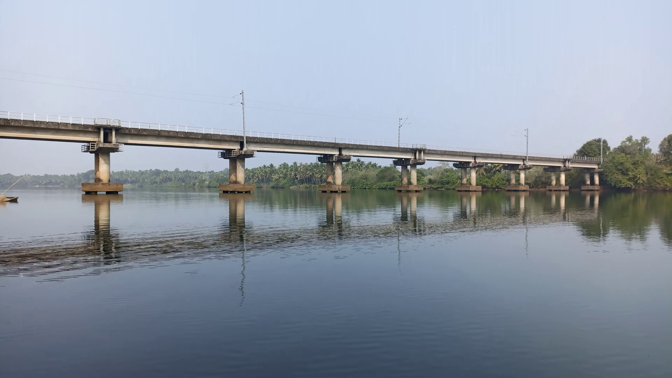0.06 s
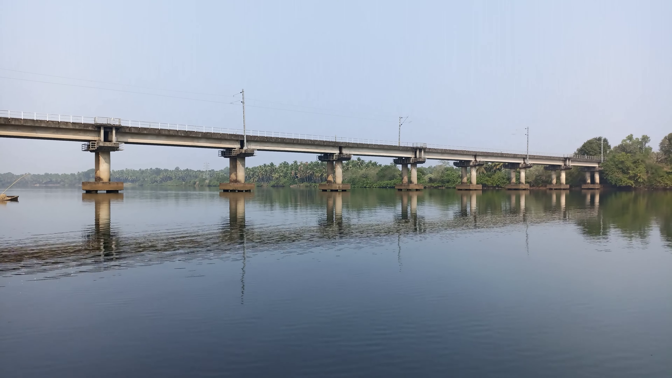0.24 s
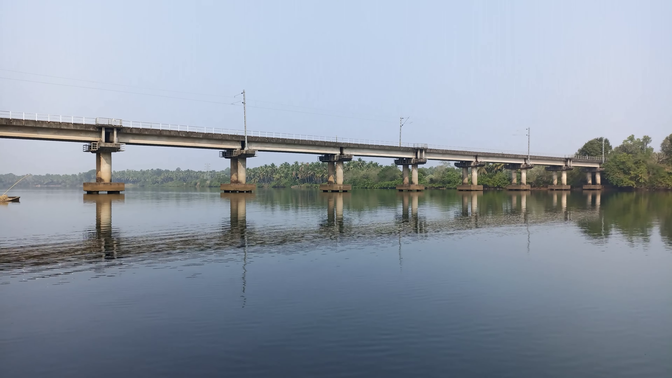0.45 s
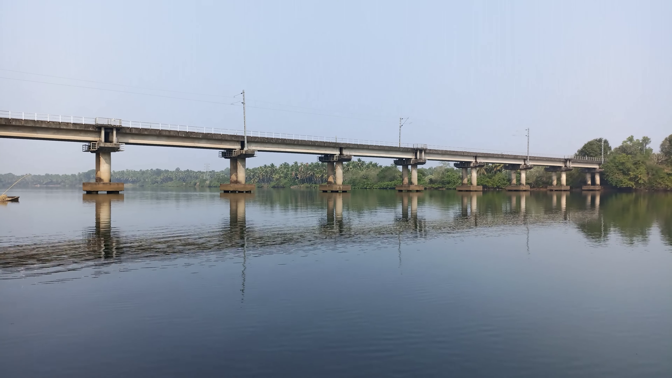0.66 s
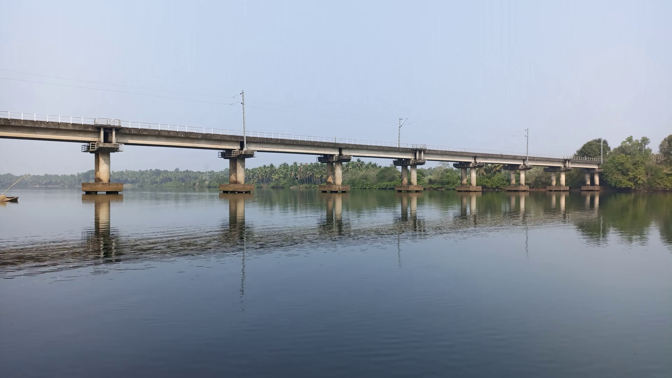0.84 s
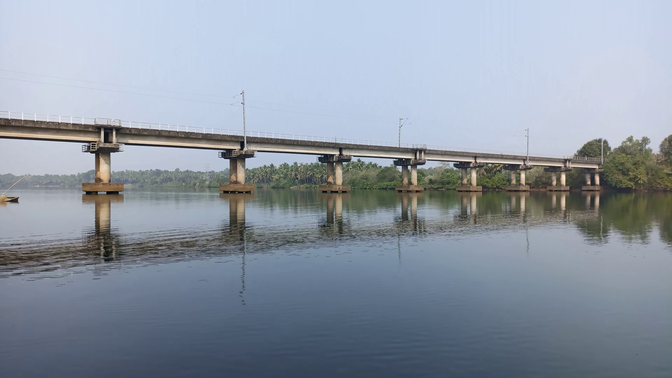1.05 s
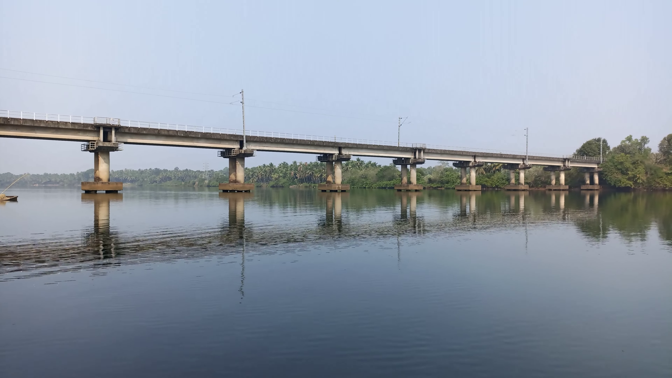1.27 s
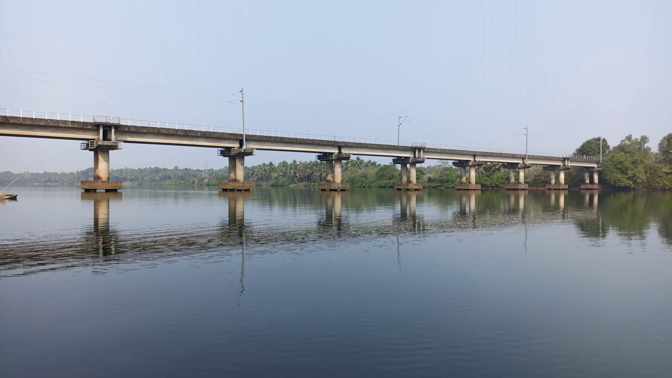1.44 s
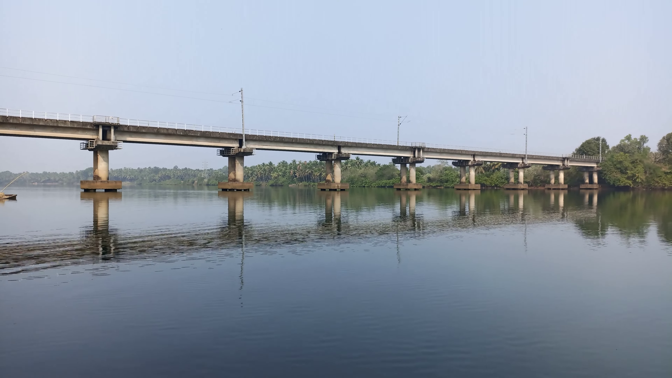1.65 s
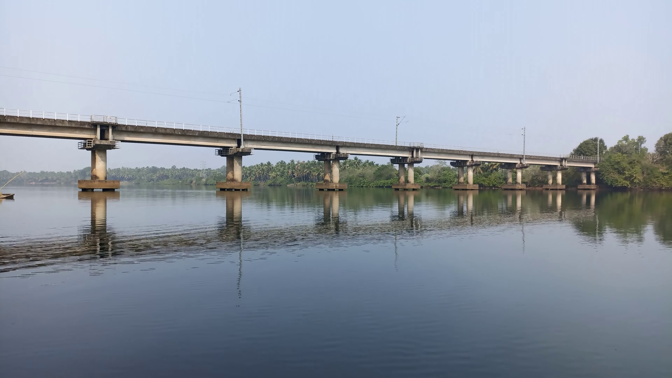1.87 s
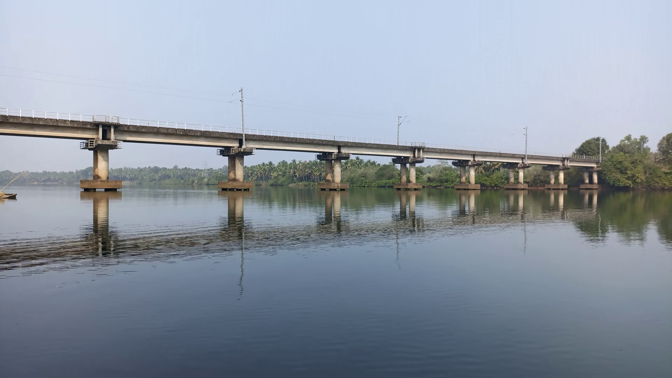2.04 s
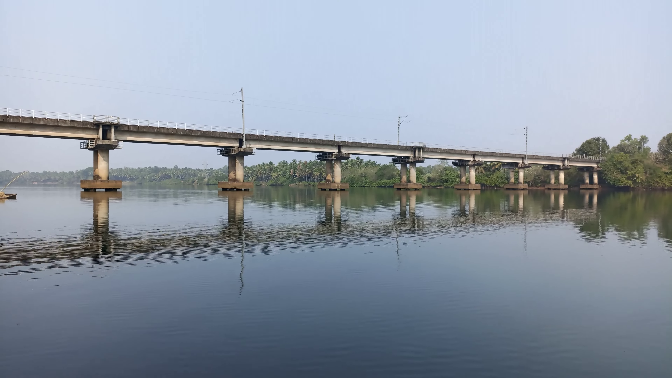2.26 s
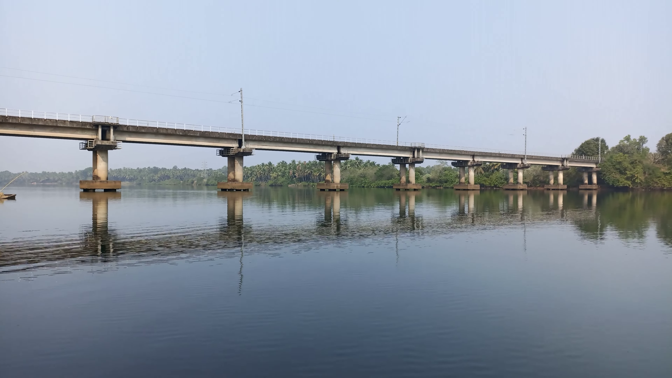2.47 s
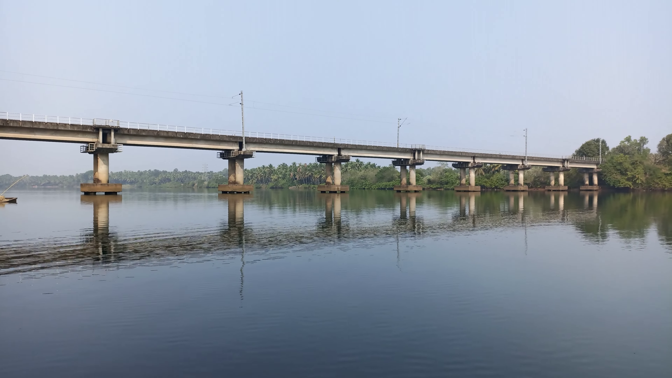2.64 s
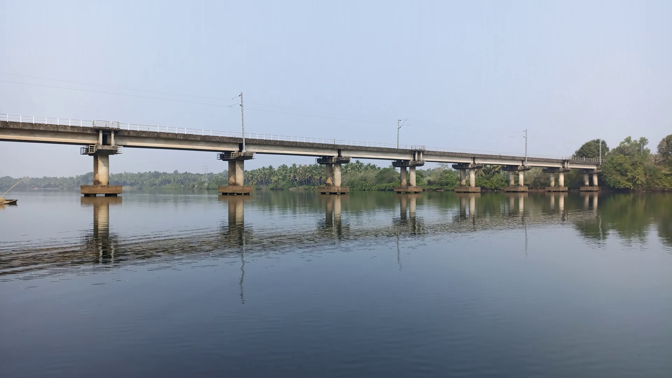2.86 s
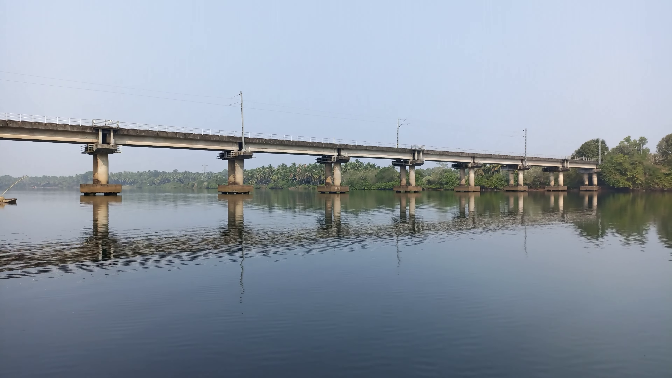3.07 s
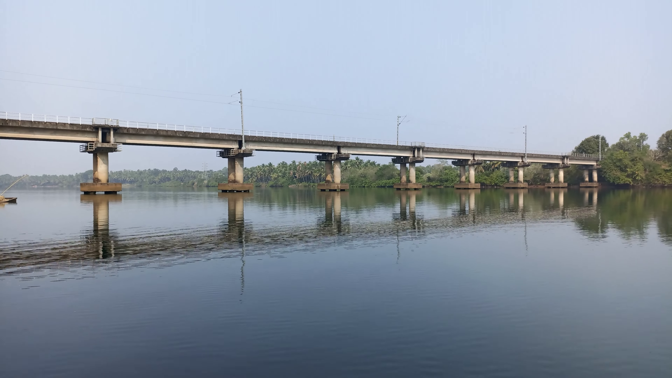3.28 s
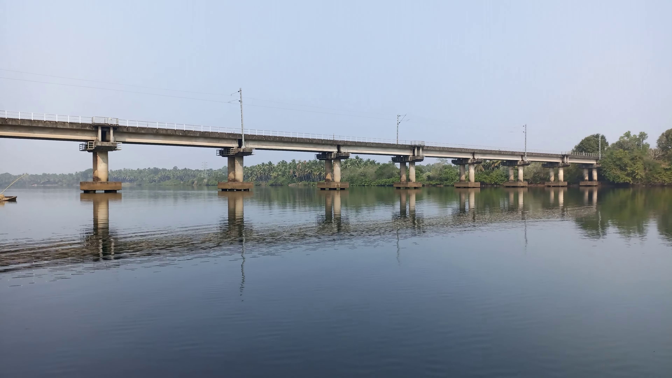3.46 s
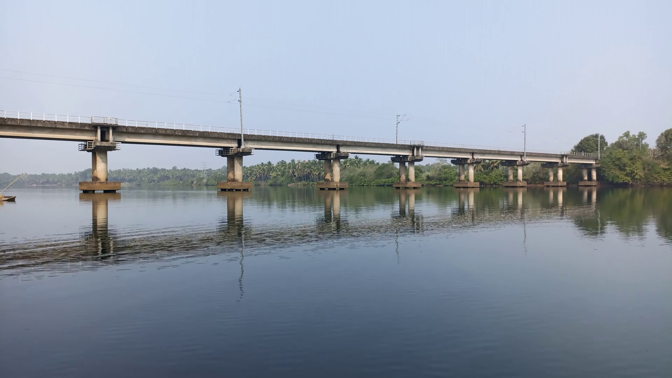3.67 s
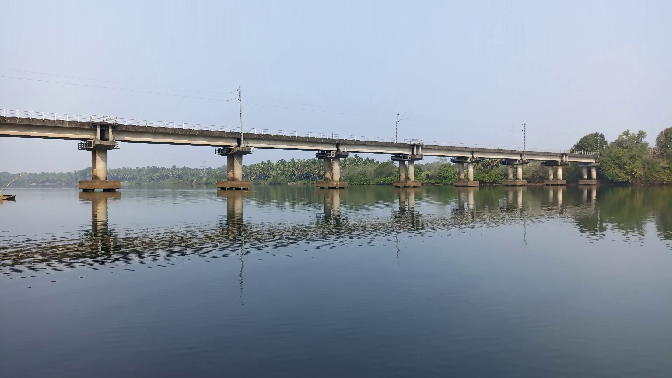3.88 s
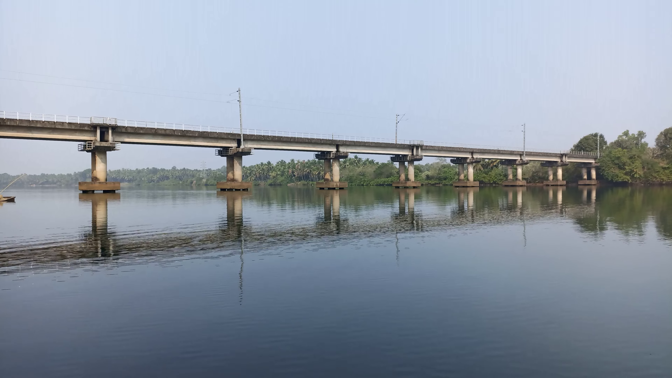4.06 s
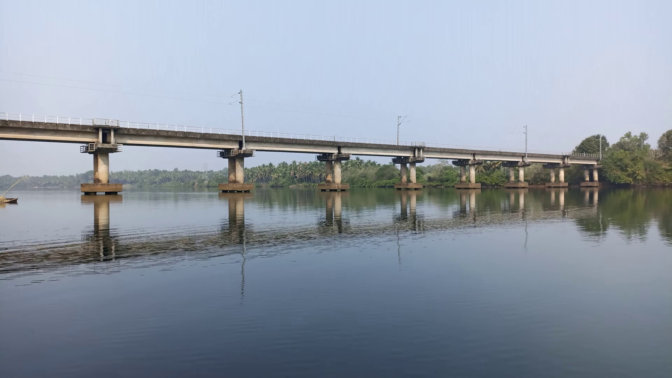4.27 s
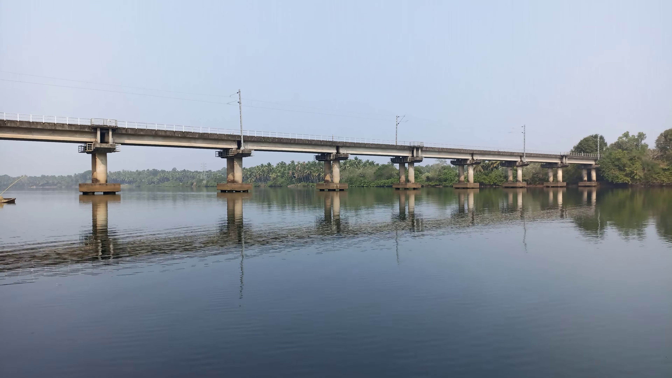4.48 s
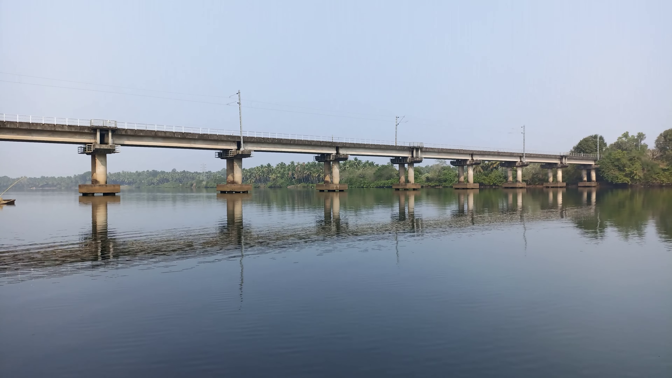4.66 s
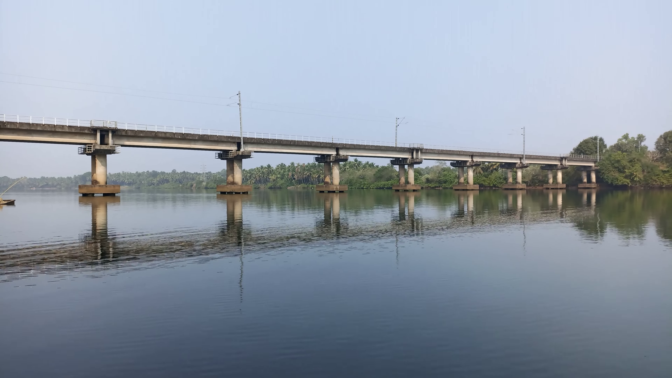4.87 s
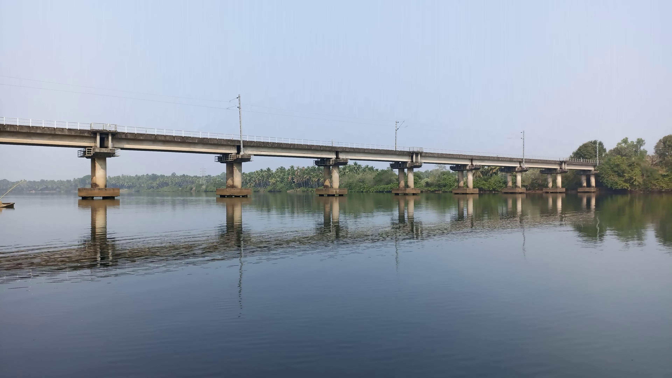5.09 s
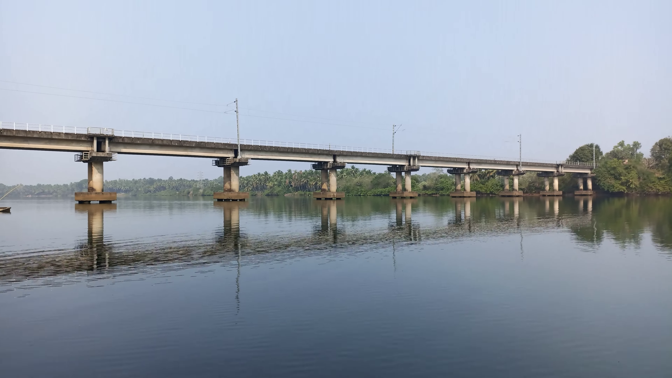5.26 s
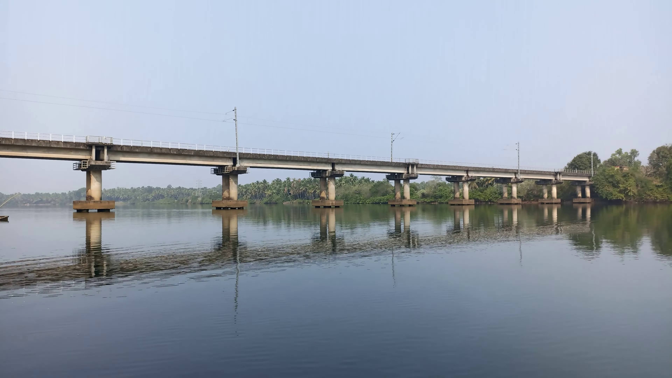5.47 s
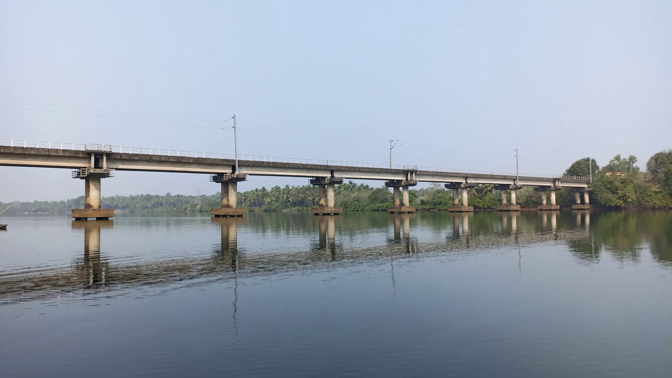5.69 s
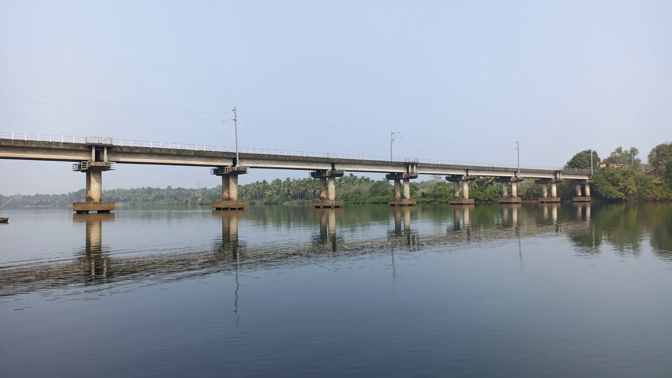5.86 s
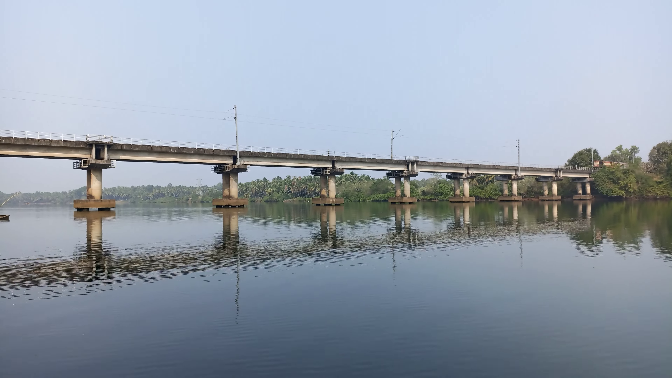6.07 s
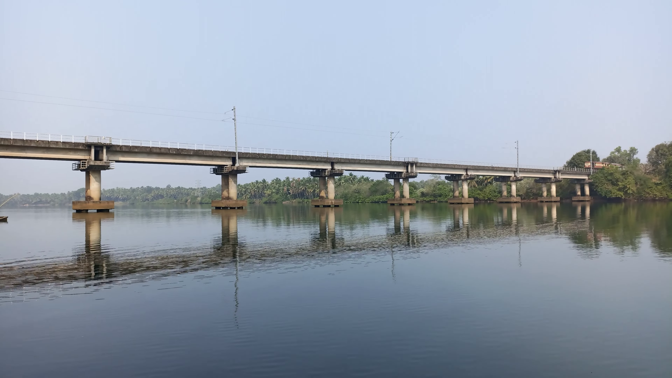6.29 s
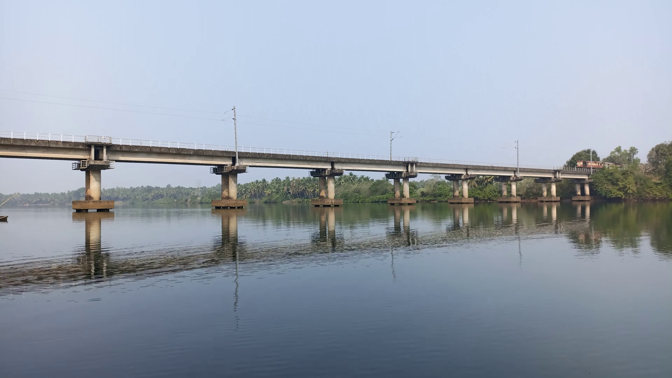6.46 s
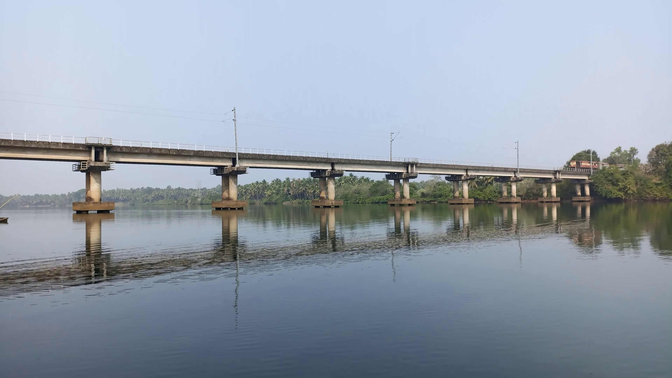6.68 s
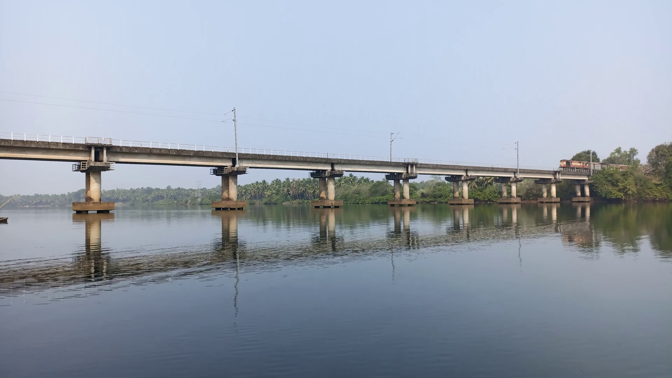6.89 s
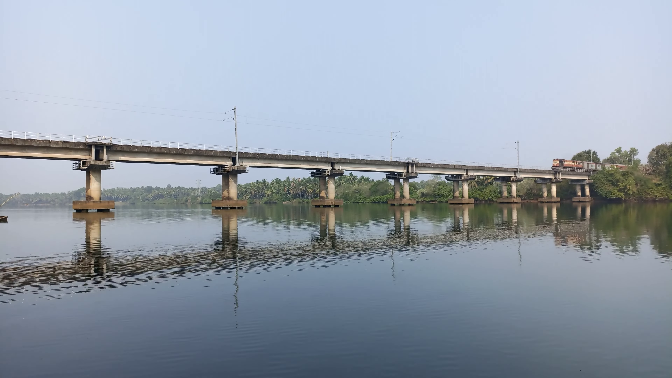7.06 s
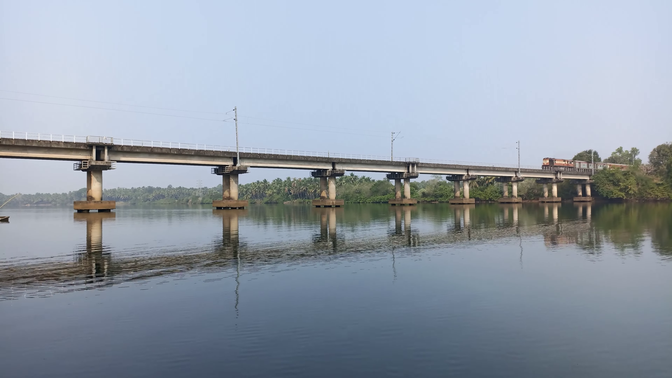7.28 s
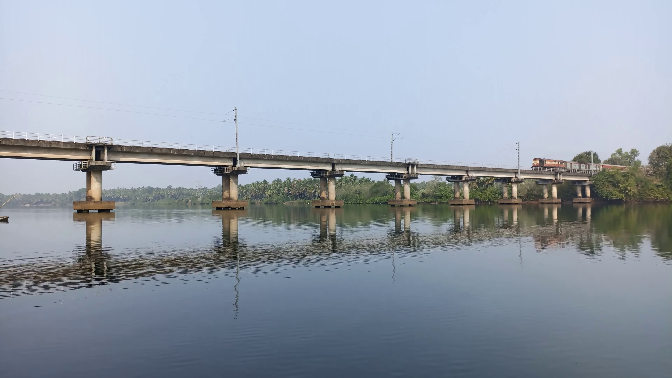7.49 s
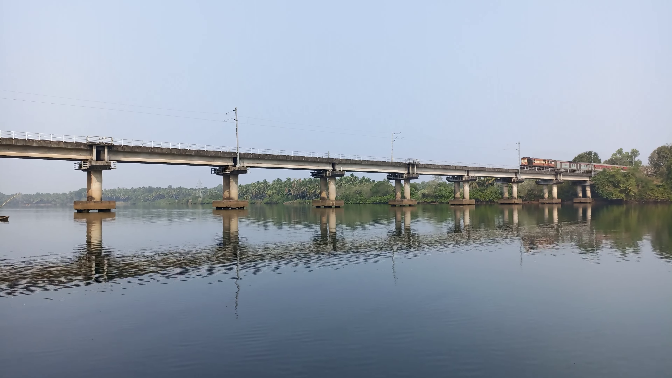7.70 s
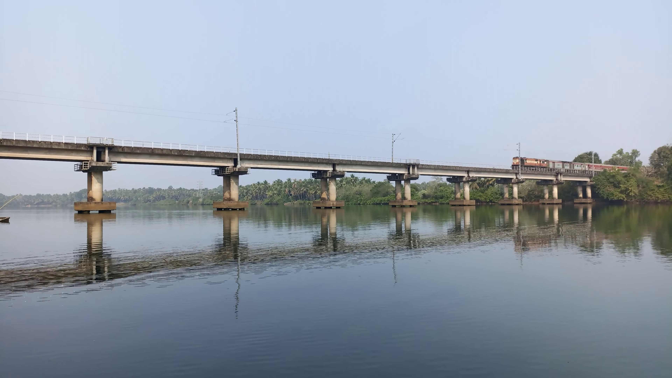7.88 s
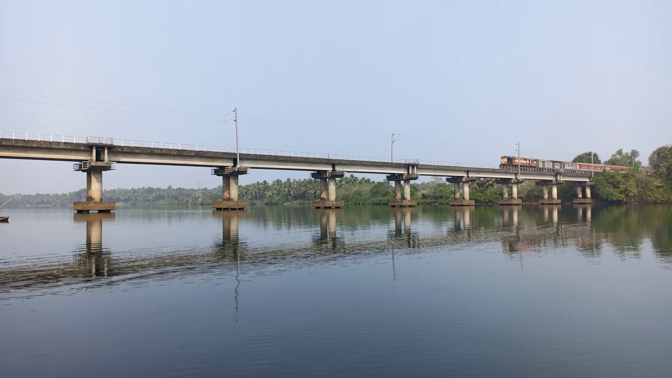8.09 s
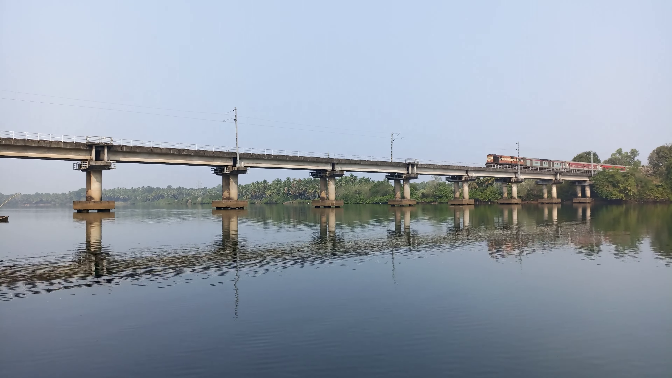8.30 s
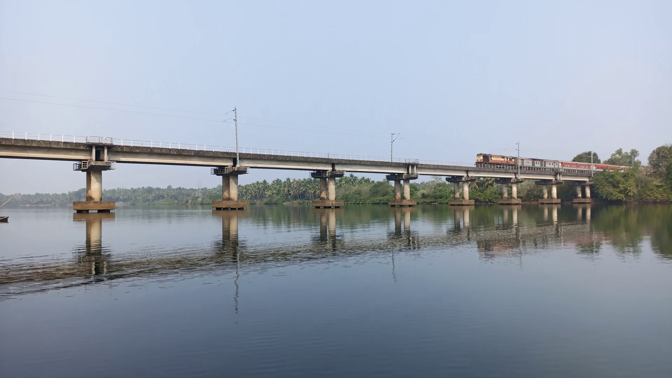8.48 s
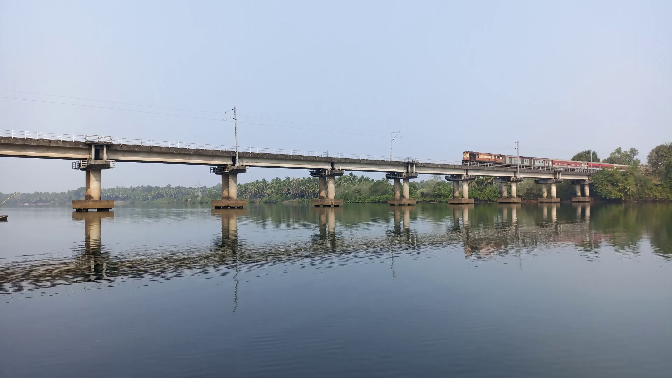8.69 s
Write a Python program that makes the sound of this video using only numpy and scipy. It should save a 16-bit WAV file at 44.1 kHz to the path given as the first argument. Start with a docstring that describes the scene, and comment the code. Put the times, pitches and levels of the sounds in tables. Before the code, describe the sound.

A train horn cuts off and echoes, then a throbbing diesel train draws nearer, its wheels hissing and clattering onto a bridge.

```python
"""A diesel train under full power, heard across still water. First its air horn shuts off and echoes
from the shores, leaving the exhaust to throb once an engine cycle. Through the first five seconds a
small bird trills and something brushes softly near the microphone. Then the coaches come out from
behind trees: their rumble and the hiss of the wheels grow, and the rails sing. From about six seconds
wheels clatter over rail joints and the train rolls onto a concrete bridge."""
import sys
import numpy as np
from scipy import signal
from scipy.fft import rfft, irfft
from scipy.io import wavfile
from scipy.ndimage import uniform_filter1d

SR = 44100
rng = np.random.default_rng(int(sys.argv[2]) if len(sys.argv) > 2 else 0)


def file_out(sig):
    """Save sig as 16-bit WAV at sys.argv[1]."""
    # one column per channel
    cols = np.atleast_2d(sig).T
    # limit, then scale
    lim = np.clip(cols, -1, 1)
    pcm = np.round(lim * 32767).astype(np.int16)
    wavfile.write(sys.argv[1], SR, pcm)


N = 385434
TIME = np.arange(N) / SR
BINS = np.fft.rfftfreq(N, 1 / SR)


def gain_of(db):
    """Decibels to amplitude."""
    return 10 ** (np.asarray(db) / 20)


def unit_rms(x):
    """Scales to rms 1."""
    return x / np.sqrt(np.mean(x ** 2) + 1e-20)


def curve(rows, t=TIME, column=1):
    """One column of a table, joined by straight lines in time."""
    columns = np.transpose(rows)
    return np.interp(t, columns[0], columns[column])


def at_hz(rows, hz, column=1):
    """One column of a table, joined on a log-frequency axis."""
    columns = np.transpose(rows)
    return np.interp(np.log(hz + 1), np.log(columns[0] + 1), columns[column])


def noise(spectrum):
    """Noise of rms 1 with the given spectrum, falling steeply beyond its top end."""
    eq = gain_of(at_hz(spectrum, BINS)) / np.maximum(BINS / spectrum[-1][0], 1) ** 2
    return unit_rms(irfft(rfft(rng.standard_normal(N)) * eq, N))


def wander(rate_hz):
    """Random modulation of rms 1, moving at up to about this rate."""
    return unit_rms(irfft(rfft(rng.standard_normal(N)) * np.exp(-(BINS / rate_hz) ** 2), N))


def swell(at_s, spread_s):
    """Bell-shaped envelope of height 1."""
    return np.exp(-((TIME - at_s) / spread_s) ** 2)


def release(t, hold_s, db_per_s):
    """Level in dB of a sound that is held and then dies away."""
    return -db_per_s * np.maximum(t - hold_s, 0)


def peaks(rows, hz):
    """Level in dB of a set of resonances."""
    return sum(height / (1 + (2 * (hz - centre) / width) ** 2) for centre, width, height in rows)


def add(mix, s, sound):
    """Mixes a sound in at time s."""
    part = mix[max(round(s * SR), 0):][:len(sound)]
    part += sound[:len(part)]


def air(level_db=-72):
    """A steady bed of still air and microphone hiss."""
    # colour of the bed: f/Hz, level/dB
    spectrum = [(30, 10), (300, 13), (2000, 16), (5000, 5.5), (8000, 3.5), (12500, 6), (15500, 6)]
    return gain_of(level_db) * noise(spectrum)


def brushes(grain_db=3.0, trim_db=1, tail_s=0.017):
    """Soft, grainy swishes and a sharp scuff; each falls as it rose, lengthened by a short tail."""
    # strokes near the microphone: t/s, rise/s, level/dB
    strokes = [(.005, 0.014, -48.5), (.03, 0.21, -65.5), (.505, .05, -58.5), (.99, .03, -67),
               (1.74, .072, -67), (2.402, 0.016, -62), (2.56, 0.13, -69), (2.81, 0.12, -63),
               (3.243, 0.0054, -46.5), (3.28, 0.039, -61), (4.77, 0.12, -64)]
    # colour of a swish: f/Hz, level/dB
    spectrum = [(2000, -6), (4000, -10), (5500, -7), (6500, 0), (7600, -5), (9200, -18), (12000, -10),
                (15500, -22)]
    envelope = sum(gain_of(db) * swell(s, np.where(TIME < s, rise, np.hypot(rise, tail_s)))
                   for s, rise, db in strokes)
    return envelope * gain_of(trim_db + grain_db * wander(200)) * noise(spectrum)


def glide(length, from_hz, to_hz, db):
    """One thin, sliding bird note."""
    hz = np.linspace(from_hz, to_hz, int(length * SR))
    return gain_of(db) * np.hanning(len(hz)) * np.sin(2 * np.pi * np.cumsum(hz) / SR)


def twitter(note_s=0.035, low_hz=4200, span_hz=2600, count=10):
    """Faint bird notes that slide up and down at random."""
    # bouts around the whistles: start/s, end/s, note level/dB
    bouts = [(0.097, .4, -78), (2.75, 3.05, -74)]
    out = np.zeros(N)
    for start, end, db in bouts:
        for when, first, last in rng.random((count, 3)):
            note = glide(note_s, low_hz + first * span_hz, low_hz + last * span_hz, db)
            add(out, start + when * (end - start), note)
    return out


def bird(trill_db=5.0, first_chip_db=-4, stray_hz=20):
    """Even trills of chips, each two quick falling notes at first and three later; a few thin glides."""
    # trills: first chip/s, last chip/s, f/Hz, level/dB
    trills = [(.646, .97, 6190, -68), (1.106, 1.419, 6290, -66.5), (2.119, 2.512, 6190, -68),
              (3.145, 3.469, 6290, -66), (3.938, 4.331, 6200, -68)]
    # thin whistles: t/s, length/s, from/Hz, to/Hz, level/dB
    whistles = [(.12, .045, 5350, 5450, -73), (.135, .046, 4140, 5200, -71), (.168, .028, 7700, 4800, -72),
                (.197, .03, 4900, 6000, -72), (.222, .032, 5800, 4000, -71), (.315, .04, 4000, 6400, -71),
                (2.87, .04, 4500, 6000, -67), (2.925, .032, 4900, 6200, -68), (2.95, .04, 6200, 4200, -68)]
    chip_gap_s, note_gap_s, note_s, fall_hz = .065, .013, .012, 420
    out = np.zeros(N)
    for first, last, pitch_hz, db in trills:
        chips = np.linspace(first, last, round((last - first) / chip_gap_s) + 1)
        for k, s in enumerate(chips):
            hz = pitch_hz + stray_hz * rng.standard_normal()
            level = db + trill_db + first_chip_db * (k == 0)
            note = glide(note_s, hz + fall_hz / 2, hz - fall_hz / 2, level)
            for repeat in range(2 + (k >= len(chips) / 2)):
                add(out, s + repeat * note_gap_s - note_s / 2, note)
    for s, length, from_hz, to_hz, db in whistles:
        add(out, s, glide(length, from_hz, to_hz, db))
    return (out + twitter()) * gain_of(wander(150))


def generator(pitch_hz=81.76, start_db=-42, db_per_s=1.89, waver_db=2.0):
    """A constant-speed generator drones on one low note, louder as it nears."""
    level = start_db + db_per_s * TIME + waver_db * wander(5.5)
    return gain_of(level) * np.sin(2 * np.pi * pitch_hz * TIME + 0.32 * wander(2.4))


def screened(open_s, spread_s, t=TIME):
    """How far the trees on the bank hide a source: 1 behind them, 0 in the open."""
    return .5 - .5 * np.tanh((t - open_s) / (2 * spread_s))


def bridge_share(t=TIME, first_wheels_s=6.46, fill_s=2.16):
    """Share of the rolling noise that comes from the bridge, growing as wheel after wheel runs on."""
    return np.clip((t - first_wheels_s) / fill_s, 0, 1)


def coaches(start_db=-45.5, db_per_s=1.89, trees_db=3.5, surge_db=3, lurch_db=0.93):
    """Bodies and bogies rumble unevenly as they near, with one brief surge while far off."""
    # colour of the rumble: f/Hz, level/dB
    spectrum = [(200, -11.5), (350, 2.5), (480, -0.5), (620, -1.5), (790, -2.5), (920, -7.5), (1080, -12.5),
                (1300, -16.5), (2500, -29.5)]
    level = start_db + db_per_s * TIME - trees_db * screened(open_s=4.76, spread_s=0.64)
    surge = surge_db * swell(at_s=3.1, spread_s=0.47)
    return gain_of(level + surge + lurch_db * wander(6.4)) * noise(spectrum)


def ringing(hz, t, far_share=0.35, growth_per_s=0.13, flare=0.31):
    """Boost in dB where wheels and rails ring; it grows as the train nears and flares at random."""
    # resonances: f/Hz, width/Hz, height/dB
    rings = [(1024, 66, 16.5), (1710, 69, 0), (2050, 88, 3), (3510, 160, 5.5), (6750, 150, 4)]
    nearness = np.minimum(far_share + growth_per_s * t, 1)
    return peaks(rings, hz) * nearness * np.interp(t, TIME, 1 + flare * wander(9))


def rail_song(hz, t, start_hz=2840, hz_per_s=21, stray_hz=45, width_hz=275, surge_db=1.6):
    """Boost in dB where the rails sing on one slowly climbing note."""
    # how far the note stands out of the rolling noise: t/s, height/dB
    prominence = [(0, 4), (2.4, 3.5), (3.2, 7), (3.9, 8), (4.2, 6), (5.3, 8), (5.65, 11), (6.1, 7),
                  (6.27, 12), (6.5, 13), (6.8, 10.5), (7.2, 5.5), (8.74, 3)]
    height_db = curve(prominence, t) + surge_db * np.interp(t, TIME, wander(12))
    centre_hz = start_hz + hz_per_s * t + stray_hz * np.interp(t, TIME, wander(9.8))
    return peaks([(centre_hz, width_hz, height_db)], hz)


def shimmer(shape, patchy_db=1.5, modes_db=0.64):
    """Random dB over frequency and time: small patches, and weak wheel modes that come and go."""
    patches = uniform_filter1d(rng.standard_normal(shape), size=5, axis=0)
    patches = uniform_filter1d(patches, size=16, axis=1)
    modes = uniform_filter1d(rng.standard_normal(shape), size=120, axis=0)
    return patchy_db * unit_rms(patches) + modes_db * unit_rms(modes)


def wheels(start_db=-55, db_per_s=2.5, trees_db=6.5, swell_db=2.0, deck_db=2.5):
    """Rolling noise of wheels and rails, dulled behind the trees and changing colour on the bridge."""
    # rolling on the bank: f/Hz, level/dB
    bank = [(600, -16.5), (1400, -7), (1850, 0.5), (2350, -1.5), (2800, -3), (3300, -6), (3900, -9),
            (5400, -8.5), (5900, -5), (6750, -6.5), (7000, -13), (9000, -26.5), (12200, -32.5),
            (15500, -61)]
    # rolling on the bridge: f/Hz, level/dB
    bridge = [(600, -29), (1200, 1.5), (1700, -0.5), (2100, 5), (2500, -7), (3300, -3.5), (4500, -7.5),
              (5600, -10.5), (6700, -12), (7200, -18), (9000, -25), (11000, -28.5), (12200, -27.5),
              (15500, -50)]
    open_s, spread_s = 4.95, 0.52  # clearing the trees
    open_db_per_khz, trees_db_per_khz = 0.37, 3
    hz, t, white = signal.stft(rng.standard_normal(N), SR, nperseg=1024, noverlap=768)
    hz, on_bridge = hz[:, None], bridge_share(t)
    bank_db = at_hz(bank, hz) + ringing(hz, t) + rail_song(hz, t)
    tilt = open_db_per_khz - trees_db_per_khz * screened(open_s, spread_s, t)
    eq_db = (1 - on_bridge) * bank_db + on_bridge * at_hz(bridge, hz) + tilt * hz / 1000
    low_cut = np.minimum(hz / 600, 1) ** 2
    eq = gain_of(eq_db + shimmer(white.shape)) * low_cut
    eq /= np.sqrt(np.mean(eq ** 2, axis=0))  # the colour moves at constant power
    roll = signal.istft(white * eq, SR, nperseg=1024, noverlap=768)[1][:N]
    level = start_db + db_per_s * TIME - trees_db * screened(open_s, spread_s)
    level += swell_db * swell(at_s=6.3, spread_s=0.69) + deck_db * bridge_share()
    return gain_of(level) * roll


def joints(clack_db=-10, clank_db=-6.5, rise_s=0.0063, ring_s=0.019):
    """Each wheel dropping into a rail joint gives a noise burst: part bright clack, part deep clank."""
    # wheel strikes: t/s, level/dB, share of clack/0-1
    strikes = [(6.284, -28, 1), (6.401, -20, 1), (6.487, -26, 1), (6.604, -25, 1), (6.861, -24, .9),
               (7.211, -25, .9), (7.328, -19, .95), (7.434, -26, .8), (7.551, -20, .8), (7.803, -20, .1),
               (7.915, -18, .6), (8.028, -20, .1), (8.124, -14.5, .5), (8.147, -13.5, .1), (8.268, -14, .5),
               (8.382, -12.5, .1), (8.62, -19, .6), (8.728, -15.5, .1)]
    # bright clack: f/Hz, level/dB
    clack_spectrum = [(400, -16.5), (1200, 3), (2000, -9), (2600, -21), (3500, 3), (4600, -4.5),
                      (6500, 3.5), (7500, -11), (12000, -22), (15500, -41)]
    # deep clank of a joint on the bridge: f/Hz, level/dB
    clank_spectrum = [(400, -7.5), (1000, 1), (1400, 4), (2000, 4.5), (2600, -7.5), (3500, -7.5),
                      (5000, -7), (6700, -23), (8000, -19.5), (12000, -29), (15500, -43)]
    clack_power, clank_power = np.zeros((2, N))
    for s, db, share in strikes:
        age = np.maximum(TIME - s + rise_s, 0)
        envelope = gain_of(db) * (1 - np.exp(-age / rise_s)) * np.exp(-age / ring_s)
        clack_power += share * envelope ** 2
        clank_power += (1 - share) * envelope ** 2
    clack = gain_of(clack_db) * np.sqrt(clack_power) * noise(clack_spectrum)
    clank = gain_of(clank_db) * np.sqrt(clank_power) * noise(clank_spectrum)
    return clack + clank


def steel(x):
    """Gives the running gear its hollow, metallic colour."""
    # peaks and dips: f/Hz, width/Hz, height/dB
    resonances = [(1746, 100, 2), (2340, 200, -1), (4600, 220, -1.5), (5480, 490, -2.5), (6790, 180, 3.5),
                  (6950, 300, -5), (9170, 510, -3), (9950, 500, 3), (11250, 700, -6.5), (11720, 280, 5.5)]
    return irfft(rfft(x) * gain_of(peaks(resonances, BINS)), N)


def horn(trim_db=0.8, hold_s=0.12, release_db_per_s=84, flutter_db=3.5, jitter_rad_per_khz=0.22):
    """Two air horns a third apart shut off; the near bank prolongs them, far shores echo them flat."""
    # partials of both notes: f/Hz, left/dB, right/dB
    partials = [(334.5, -32, -33), (415.5, -35.5, -29.5), (669, -43.5, -47), (831, -28.7, -35.5),
                (1003, -66, -58), (1167, -51.5, -59), (1247, -45, -41.5), (1338, -63, -60),
                (1500, -68, -66), (1662, -53.5, -49.5), (2012, -65, -72), (2077, -65, -66),
                (2340, -73, -75), (2492, -69, -72), (2685, -68, -70), (2907, -68, -72), (3017, -61, -67),
                (3350, -72, -80)]
    # colour of the far echo: f/Hz, level/dB
    echo_eq = [(334, -5), (415, 0), (669, 5), (831, -14), (1247, 1), (1662, 6), (3000, -3)]
    # tail from the near bank: f/Hz, level against the horn/dB, release/dB per s
    bank_tail = [(334, -20, 22), (415, -23, 22), (669, -25, 22), (831, -29, 3), (1003, -22, 22),
                 (1167, -17, 22), (1247, -1.5, 21), (1662, -17, 22), (3000, -21, 22)]
    echo_trim_db, echo_pitch_ratio, echo_width_hz = -14.5, 0.968, 6
    build_db, build_s, air_db_per_khz_s, right_lag_s = 7, 0.25, 5, 0.00036
    t = TIME[:SR * 5 // 2]
    drift, shake, blur = wander(10), wander(60), wander(echo_width_hz)
    blast_db = release(t, hold_s, release_db_per_s)
    echo_db = echo_trim_db + release(t, hold_s=0.75, db_per_s=26) - build_db * np.exp(-t / build_s)
    out = np.zeros((2, N))
    for hz, left_db, right_db in partials:
        # each partial wavers on its own stretches of the modulation
        a, b, c, d, e = rng.integers(0, N - len(t), (5, 1)) + np.arange(len(t))
        khz = hz / 1000
        # moving air shakes the high partials most
        direct = gain_of(blast_db + flutter_db * min(khz, 1) * drift[a])
        direct = direct * np.exp(1j * jitter_rad_per_khz * khz * shake[a])
        echo_gain = gain_of(echo_db + at_hz(echo_eq, hz) - air_db_per_khz_s * t * khz)
        echo = echo_gain * (blur[b] + 1j * blur[c]) / 2
        tail_db = at_hz(bank_tail, hz) + release(t, hold_s, at_hz(bank_tail, hz, column=2))
        tail = gain_of(tail_db) * (blur[d] + 1j * blur[e]) / 2
        phase = 2j * np.pi * (hz * t + rng.random())
        partial = (direct + tail) * np.exp(phase) + echo * np.exp(echo_pitch_ratio * phase)
        out[0, :len(t)] += gain_of(left_db) * partial.real
        out[1, :len(t)] += gain_of(right_db) * (partial * np.exp(-2j * np.pi * hz * right_lag_s)).real
    return np.sqrt(2) * gain_of(trim_db) * out


def hollow_roar(width_hz=42):
    """A narrow band of the roar stands out and climbs in pitch while the train is still far off."""
    # path of the band: t/s, f/Hz, level/dB
    sweep = [(0, 169, -56.5), (2.4, 199.3, -37.5), (3.0, 220.3, -51), (3.7, 239.6, -38.5),
             (4.2, 441.3, -42.5), (5.4, 470.4, -45), (8.74, 480, -72)]
    carrier = np.exp(2j * np.pi * np.cumsum(curve(sweep)) / SR)
    band = (carrier * (wander(width_hz) + 1j * wander(width_hz))).real
    return gain_of(curve(sweep, column=2)) * band


def engine_cycles(first_throb_s=.121):
    """Cycles since the first throb, as the engine gathers speed and levels off."""
    # engine speed: t/s, cycle rate/Hz
    speed = [(0, 7.95), (2.3, 7.95), (2.75, 8.2), (3.2, 8.52), (4, 8.55), (5.5, 8.575), (6.5, 8.57),
             (8.74, 8.535)]
    cycles = np.cumsum(curve(speed)) / SR
    return cycles - np.interp(first_throb_s, TIME, cycles)


def exhaust(start_db=-38.5, db_per_s=2.5, waver_db=1.5, uneven_db=.6):
    """Cylinders fire unevenly into the manifold: engine orders pile into throbs over a pulsing roar."""
    # engine orders: multiple of the cycle rate, far level/dB, near level/dB
    orders = [(11, -21, -22), (12, -14.5, -14.5), (13, -20, -20), (14, -14, -12.5), (44 / 3, -24, -14),
              (15, -11, -8), (16, -10.5, -8), (17, -10.5, -13.5), (18, -23, -14), (19, -21, -22),
              (20, -17.5, -22), (21, -12, -13.5), (22, -16.5, -20.5), (23, -15, -19), (24, -15.5, -14.5),
              (25, -21, -23), (26, -19.5, -23), (27, -18.5, -21), (28, -14, -19), (29, -21, -28),
              (31, -17.5, -26), (33, -19.5, -24.5), (36, -28, -25), (39, -27, -29)]
    # notches between the exhaust's resonances, where its polarity flips: order
    notches = [11.5, 13.5, 17.5, 20.5, 27.5, 31.5]
    # turbulent roar: f/Hz, level/dB
    roar_spectrum = [(25, -48), (55, -21), (67, -11.5), (85, -5), (110, -1.5), (130, -1), (160, -3.5),
                     (205, -6.5), (285, -6.5), (400, -15), (800, -32), (2000, -41.5)]
    far_s, near_s = 2.7, 7.2  # crossfade from the far balance to the near one
    roar_far_db, roar_near_db, throb_depth = -5, -6, .2
    lag_cycles, lag_from_order, smear_rad = .08, 20, .58
    cycles, tones = engine_cycles(), np.zeros(N)
    near = np.clip((TIME - far_s) / (near_s - far_s), 0, 1)
    sway, fade = wander(1.2), wander(1.63)
    for order, far_db, near_db in orders:
        sway_shift, fade_shift = rng.integers(0, N, 2)
        # the orders arrive together in each chug, the upper ones a little late
        lag = 2 * np.pi * lag_cycles * max(order - lag_from_order, 0)
        phase = np.pi * np.searchsorted(notches, order) - lag + smear_rad * np.roll(sway, sway_shift)
        db = far_db + (near_db - far_db) * near + waver_db * np.roll(fade, fade_shift)
        tones += np.sqrt(2) * gain_of(db) * np.cos(2 * np.pi * order * cycles + phase)
    throb = unit_rms(np.exp(throb_depth * np.cos(2 * np.pi * cycles)))
    roar = gain_of(roar_far_db + (roar_near_db - roar_far_db) * near) * noise(roar_spectrum) * throb
    return gain_of(start_db + db_per_s * TIME) * (tones * gain_of(uneven_db * wander(3)) + roar)


def train(rattle):
    """Locomotive and coaches in mono; the rattle gain shakes all of the wheel hiss together."""
    return exhaust() + hollow_roar() + generator() + coaches() + steel(rattle * wheels() + joints())


def microphone_ports(direct, diffuse):
    """The casing shades and delays the train's sound differently at the left and right ports."""
    # stereo image: f/Hz, left minus right/dB, left lead/rad, coherence/0-1
    image = [(96.5, 0.4, 0.18, 1), (222, 1.6, 0.5, 1), (353, 5, -0.47, 0.78), (413, -1.5, -1.6, 0.96),
             (500, -3.5, -1, 0.85), (668, 0, 0.26, 0.66), (879, 10, -2.5, 1), (990, -7.5, -2.5, 0.62),
             (1140, 0, -2.5, 0.52), (1785, -2.5, -2, 0.76), (2120, 8.5, -2.5, 0.52), (2500, 2.5, -5.5, 0.3),
             (3430, 4.5, -5.5, 0.4), (3770, 11, -7.5, 0), (4130, 1.5, -8, 0.44), (5870, 4, -11, 0.6),
             (7060, 14, -11, 0.3), (7840, 0.5, -13.5, 0.4), (8500, 11, -8.5, 0.1),
             (10300, -15.5, -27.5, 0.05), (12500, -14.5, -6, .1), (15500, -3, -25, .1)]
    side_db, lead, coherence = (at_hz(image, BINS, column) for column in (1, 2, 3))
    direct, diffuse = rfft(direct), rfft(diffuse)
    left = direct * gain_of(side_db)
    right = coherence * np.exp(-1j * lead) * direct + np.sqrt(1 - coherence ** 2) * diffuse
    return irfft(np.array([left, right]) / np.sqrt((1 + gain_of(side_db) ** 2) / 2), N)


def scene(rattle_db=0.69, bird_pan_db=3):
    """The train and its horn in stereo, with brushes, still air and the bird to the left."""
    rattle = gain_of(rattle_db * wander(23))
    direct, diffuse = train(rattle), train(rattle)
    close = np.array([brushes() + air() for _ in range(2)])
    bird_pan = gain_of([[bird_pan_db], [-bird_pan_db]])
    return microphone_ports(direct, diffuse) + horn() + close + bird() * bird_pan


def record(dry, cutoff_hz=15700):
    """A steep low-pass takes off the very top."""
    low_pass = signal.firwin(511, cutoff_hz, window=("kaiser", 9), fs=SR)
    return signal.oaconvolve(dry, low_pass[None], "same")


dry = scene()
out = record(dry)
file_out(out)
```